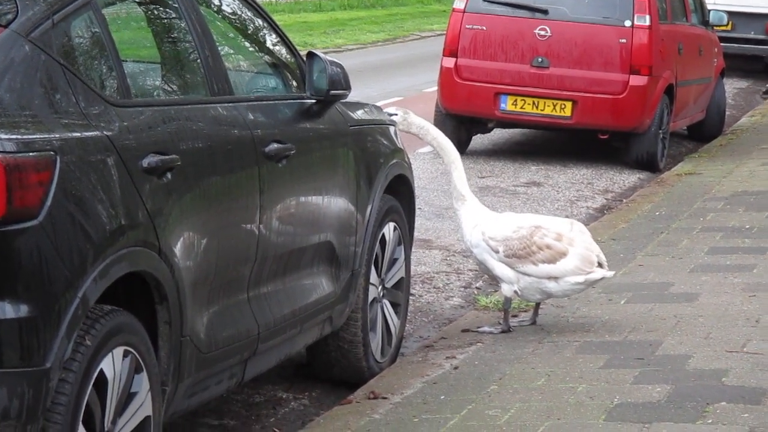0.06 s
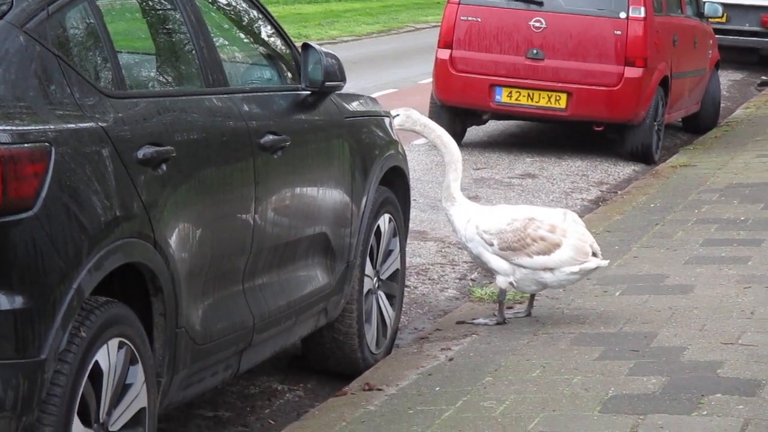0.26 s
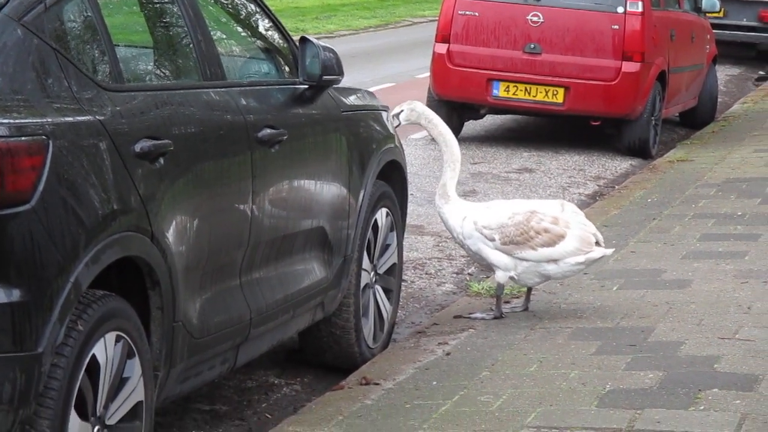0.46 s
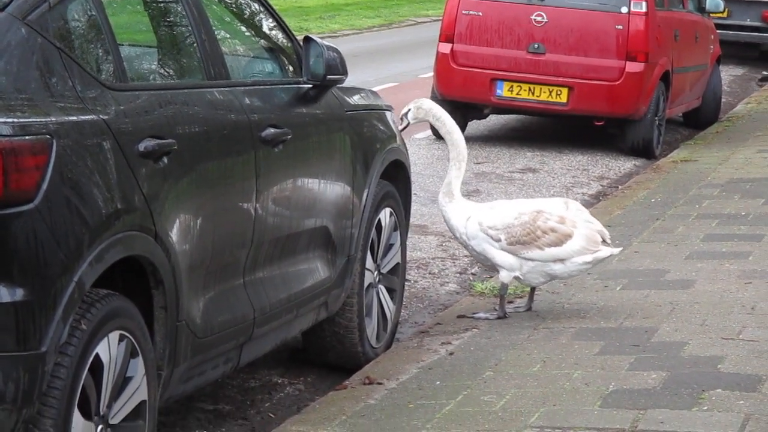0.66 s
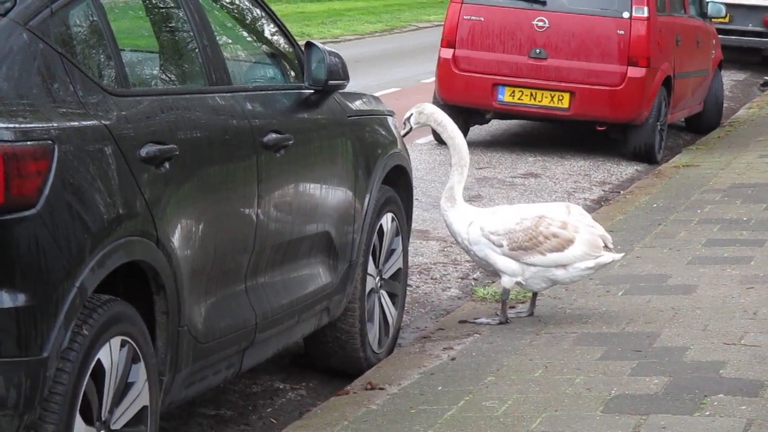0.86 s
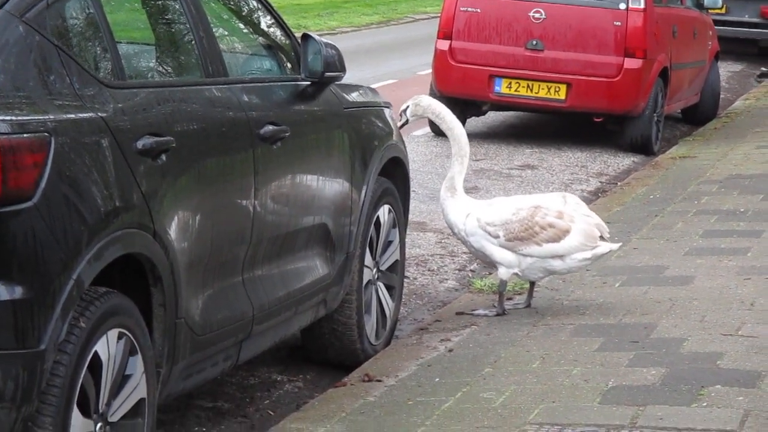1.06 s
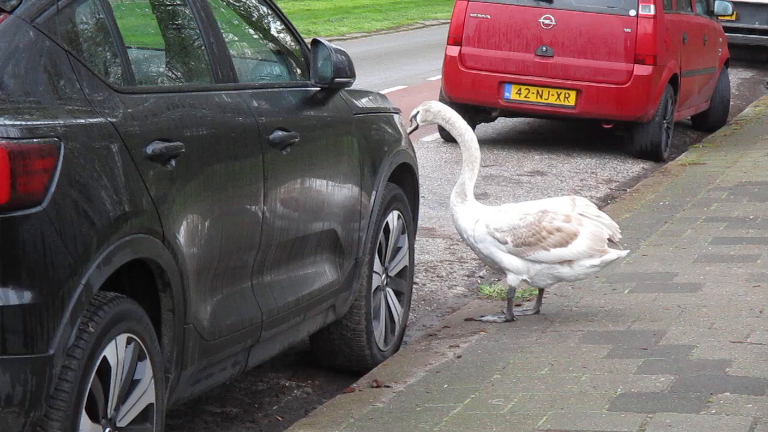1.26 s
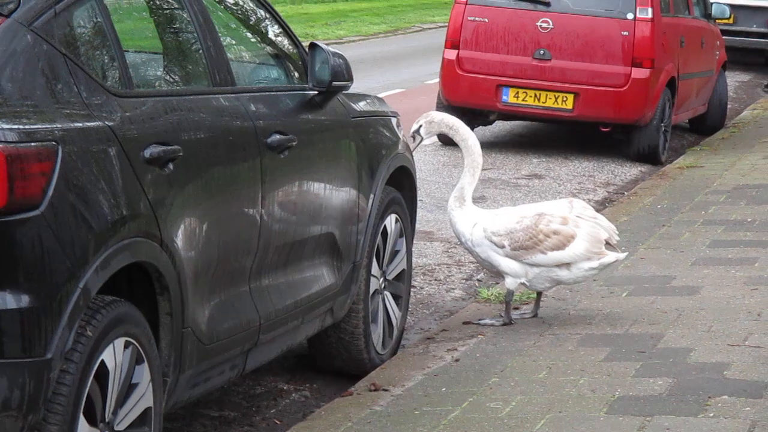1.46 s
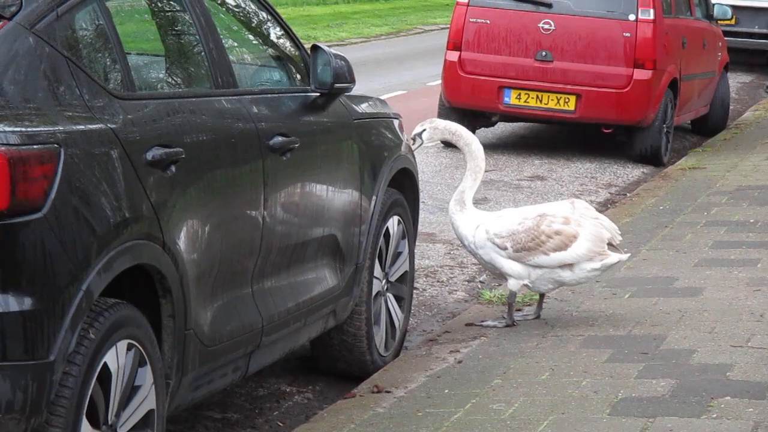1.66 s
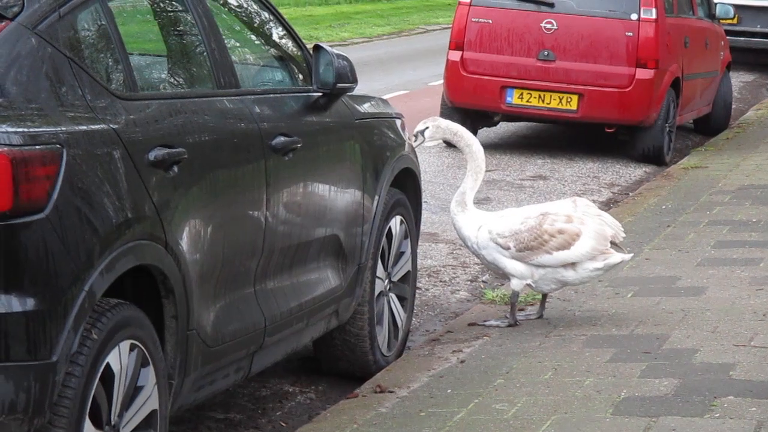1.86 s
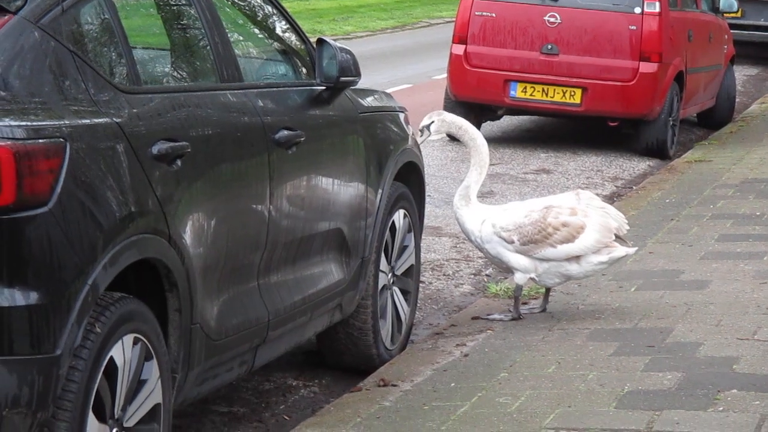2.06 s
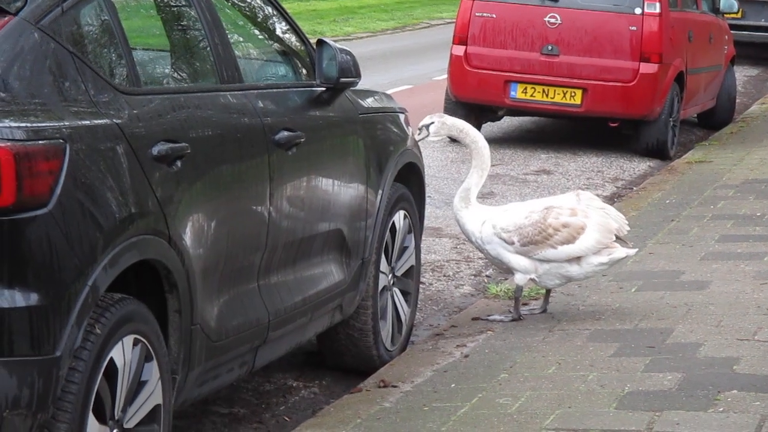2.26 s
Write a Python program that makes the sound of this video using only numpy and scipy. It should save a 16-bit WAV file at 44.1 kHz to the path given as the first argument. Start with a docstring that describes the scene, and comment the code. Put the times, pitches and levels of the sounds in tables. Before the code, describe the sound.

Low, damped knocks sound close by as a swan's beak hits a car panel, loudest at the start, then softer and uneven. Behind them, far traffic rumbles steadily outdoors, a songbird whistles faintly and another bird chatters near the end.

```python
"""Beside a road, a swan pecks at the wing of a parked car.
Each knock is a tick and clack of the beak, a short push of the panel and a low, well damped body boom.
Distant traffic lays a bed of engine rumble and tyre noise, under airy hiss and a thin steady whine.
A songbird whistles, later another bird chatters, and both slap back off the house fronts."""
import sys
import numpy as np
from scipy import signal
from scipy.fft import rfft, irfft
from scipy.io import wavfile

SR = 44100
rng = np.random.default_rng(int(sys.argv[2]) if len(sys.argv) > 2 else 0)


def wrap_up_sound(samples):
    """Save the sound to the file named by the first command line argument, as 16-bit audio."""
    columns = np.atleast_2d(samples).T
    # keep every value between -1 and 1, then stretch to whole-number steps
    tamed = np.clip(columns, -1, 1)
    steps = np.round(tamed * 32767).astype(np.int16)
    wavfile.write(sys.argv[1], SR, steps)


N = 105840
TIME = np.arange(N) / SR

# Colours of far engines, far tyres, and the hiss of air and far birds: frequency_hz, density_db
ENGINE_COLOUR = [(12, -29), (28, -4.5), (60, 3), (120, -2), (200, -6), (300, -14.5), (420, -17.5),
                 (570, -18), (780, -26.5), (1500, -49), (4000, -74)]
TYRE_COLOUR = [(500, -14), (800, -7.5), (1020, 5.5), (1120, -2.5), (1230, -2.5), (1350, -22), (2200, -23)]
AIR_COLOUR = [(300, -16), (1400, 3), (2000, 0), (2700, -2), (3300, 3), (3850, 2), (4100, -4.5), (8000, -7),
              (11500, -11.5), (15500, -19)]
# Fader ride on the traffic: time_s, gain_db
TRAFFIC_RIDE = [(0, 14.5), (.04, 0), (.2, 1), (.8, -0.5), (1.6, 0.5), (2.4, 0)]
# Partials of the whine: pitch_hz, rms_db
WHINE_PARTIALS = [(3941, -73.5), (7882, -88)]
# The songbird's slurs: start_s, length_s, start_hz, middle_hz, end_hz, level_db
SONG_SLURS = [(0.075, 0.14, 3100, 3500, 3620, -73), (0.275, 0.033, 3350, 3560, 3680, -64),
              (0.382, 0.094, 3080, 3370, 3540, -60.5), (.665, 0.054, 3150, 3330, 3500, -62),
              (1.22, 0.13, 2850, 3405, 3650, -59.5), (1.506, 0.12, 2950, 3380, 3100, -62.5),
              (1.614, 0.064, 3320, 3440, 3070, -58), (1.772, .05, 2600, 2560, 2600, -57),
              (1.893, 0.035, 3350, 3230, 3200, -55.5)]
# Slapback off the house fronts: delay_s, gain_db
HOUSE_ECHOES = [(0.033, -13.5), (.057, -22.5), (.094, -18)]
# Beak hits on the panel: start_s, push_db, push_hz, push_width_cycles, boom_db, clack_db, tick_db
PECKS = [(0.2441, -6.5, 318, 0.37, -13, -35, -32.5), (0.3248, -14.5, 156, 0.57, -16, -27.5, -37),
         (0.7470, -31, 455, 0.44, -38, -38, -53), (0.982, -34.5, 278, 0.57, -31.5, -40, -47),
         (0.999, -31, 150, 0.56, -34, -51, -47), (1.0470, -24.5, 160, 0.61, -30, -40.5, -53),
         (1.0620, -24, 255, 0.49, -33.5, -44, -45), (1.2203, -30.5, 388, 0.58, -31, -37, -61),
         (1.433, -31, 238, 0.48, -28, -43, -57), (1.565, -27, 220, 0.36, -32.5, -51, -52),
         (1.6660, -31, 162, 0.52, -30, -56, -52), (1.718, -30, 289, 0.4, -50, -56, -64),
         (1.8634, -19.5, 253, 0.27, -35, -44, -60), (2.1089, -10.5, 219, 0.57, -55, -36, -64),
         (2.182, -31.5, 199, 0.49, -46, -63, -65), (2.2680, -62, 117, .6, -31, -47.5, -66)]
# Low modes of the car body: pitch_hz, gain_db, rise_s
CAR_MODES = [(66.3, 3, 0.0087), (169.5, -9, 0.0059), (275, -22, 0.0059), (72.7, -27, .035)]
# Colours of the beak's hollow clack and bright tick: frequency_hz, density_db
CLACK_COLOUR = [(200, 0), (420, 6.5), (560, 5), (760, -8.5), (1000, -0.5), (1400, -29.5), (3000, -47)]
TICK_COLOUR = [(700, 5.5), (1400, -14), (1950, -4), (2500, -8), (3200, -8), (4300, -20), (9000, -38)]
# The second bird's harsh notes: centre_s, level_db
CHATTER_NOTES = [(1.708, -56), (1.781, -53), (1.857, -52), (1.937, -51.5), (2.025, -50.5), (2.10, -60.5),
                 (2.19, -59.5)]
# Colour of that bird's throat: frequency_hz, density_db
THROAT_COLOUR = [(1200, -28), (1900, -8.5), (2300, -2), (2900, -0.5), (3600, -5), (4200, -14), (5000, -11),
                 (5800, -22), (9000, -38)]


def from_db(db):
    """Decibels to gain."""
    return 10 ** (np.asarray(db) / 20)


def unit_rms(x):
    """Scale to unit rms."""
    return x / np.sqrt(np.mean(x ** 2) + 1e-20)


def noise(colour):
    """Noise of the given colour at unit rms."""
    hz, db = np.transpose(colour)
    bins = np.maximum(np.arange(N // 2 + 1) * SR / N, 1)
    gain = from_db(np.interp(np.log(bins), np.log(hz), db))
    gain /= np.sqrt(1 + (bins / (2 * hz[-1])) ** 4)
    return unit_rms(irfft(rfft(rng.standard_normal(N)) * gain, N))


def drift(rate_hz):
    """Slow random wander at unit rms."""
    pole = np.exp(-2 * np.pi * rate_hz / SR)
    wander = signal.lfilter([1], [1, -2 * pole, pole * pole], rng.standard_normal(2 * N))
    return unit_rms(wander[N:])


def swell(age, rise_s):
    """An envelope that rises to 1 at rise_s, then dies away."""
    u = np.clip(age / rise_s, 0, 60)
    return u * np.exp(1 - u)


def burst(grain, envelope):
    """Noise under a short envelope, with the energy of that envelope."""
    return unit_rms(grain * envelope) * np.sqrt(np.mean(envelope ** 2))


def traffic(engine_db=-40, tyre_db=-56, engine_sway_db=1, tyre_sway_db=0.83):
    """Far engines rumble and tyres rush, each gently swaying in level."""
    engines = noise(ENGINE_COLOUR) * from_db(engine_db + engine_sway_db * drift(rate_hz=3.6))
    tyres = noise(TYRE_COLOUR) * from_db(tyre_db + tyre_sway_db * drift(rate_hz=16))
    ride_db = np.interp(TIME, *np.transpose(TRAFFIC_RIDE))
    return (engines + tyres) * from_db(ride_db)


def air(level_db=-59):
    """Air and far birds blur into an even hiss."""
    return noise(AIR_COLOUR) * from_db(level_db)


def whine():
    """A thin steady tone with a faint octave on top."""
    return sum(from_db(db) * np.sqrt(2) * np.sin(2 * np.pi * hz * TIME) for hz, db in WHINE_PARTIALS)


def songbird(waver_db=1.0):
    """Pure slurred whistles, each bending through three pitches."""
    song = np.zeros(N)
    for start_s, length_s, start_hz, middle_hz, end_hz, db in SONG_SLURS:
        progress = np.clip((TIME - start_s) / length_s, 0, 1)
        bend = np.polyfit([0, .5, 1], [start_hz, middle_hz, end_hz], 2)
        pitch_hz = np.polyval(bend, progress)
        envelope = np.sqrt(np.abs(np.sin(np.pi * progress)))
        song += from_db(db) * envelope * np.sin(2 * np.pi * np.cumsum(pitch_hz) / SR)
    return song * from_db(waver_db * drift(rate_hz=25))


def slapback(direct):
    """The direct sound plus a few short echoes off the house fronts."""
    return direct + sum(from_db(db) * np.interp(TIME - delay_s, TIME, direct, left=0)
                        for delay_s, db in HOUSE_ECHOES)


def swan_pecks(push_lag_cycles=0.91, body_lag_s=0.0034, low_cut_hz=31):
    """The beak ticks and clacks, the panel dents and springs back, the body booms for a few cycles."""
    knocks = np.zeros(N)
    clack_noise, tick_noise = noise(CLACK_COLOUR), noise(TICK_COLOUR)
    for start_s, push_db, push_hz, push_width_cycles, boom_db, clack_db, tick_db in PECKS:
        near = (TIME > start_s - .02) & (TIME < start_s + .15)
        age = TIME[near] - start_s
        tick = burst(tick_noise[near], swell(age, rise_s=0.00088))
        clack = burst(clack_noise[near], swell(age, rise_s=0.0021))
        cycles = age * push_hz - push_lag_cycles   # the panel gives way just after the touch
        push = -np.cos(2 * np.pi * cycles) * np.exp(-(cycles / push_width_cycles) ** 2)
        body_age = age - body_lag_s
        boom = sum(from_db(db) * swell(body_age, rise_s) ** 2 * np.sin(2 * np.pi * hz * body_age)
                   for hz, db, rise_s in CAR_MODES)
        knocks[near] += (from_db(tick_db) * tick + from_db(clack_db) * clack
                         + from_db(push_db) * push + from_db(boom_db) * boom)
    return signal.sosfilt(signal.butter(2, low_cut_hz, "high", fs=SR, output="sos"), knocks)


def bird_chatter(half_width_s=0.02, rasp_hz=326, rasp_depth=0.25, rasp_wander=0.103):
    """Short puffs of throaty noise, roughened into a rasp by a fast tremolo."""
    notes = sum(from_db(db) * np.exp(-((TIME - centre_s) / half_width_s) ** 2)
                for centre_s, db in CHATTER_NOTES)
    tremolo_hz = rasp_hz * (1 + rasp_wander * drift(rate_hz=30))
    rasp = 1 + rasp_depth * np.sin(2 * np.pi * np.cumsum(tremolo_hz) / SR)
    return notes * unit_rms(rasp * noise(THROAT_COLOUR))


def scene():
    """A mono mix: dry pecks up front, birds farther off, the street bed behind."""
    pecks = swan_pecks()
    birds = slapback(songbird() + bird_chatter())
    bed = traffic() + air() + whine()
    return (pecks + birds + bed)[None]


def record(dry):
    """A steep high cut takes off the very top."""
    high_cut_hz = 15700
    return signal.sosfilt(signal.ellip(12, .1, 90, high_cut_hz, fs=SR, output="sos"), dry)


dry = scene()
out = record(dry)
wrap_up_sound(out)
```